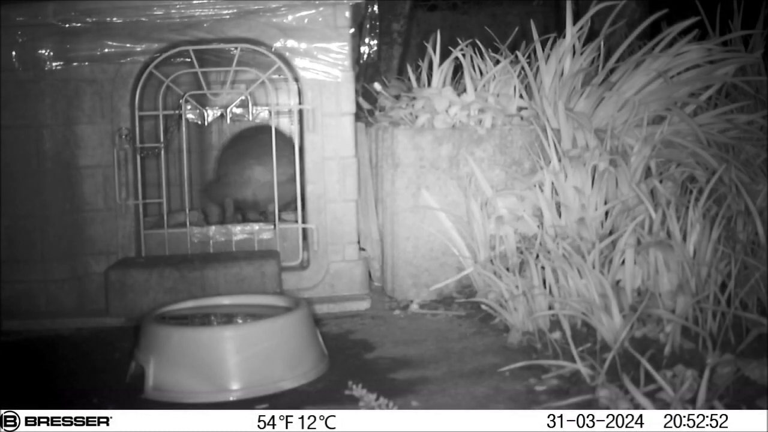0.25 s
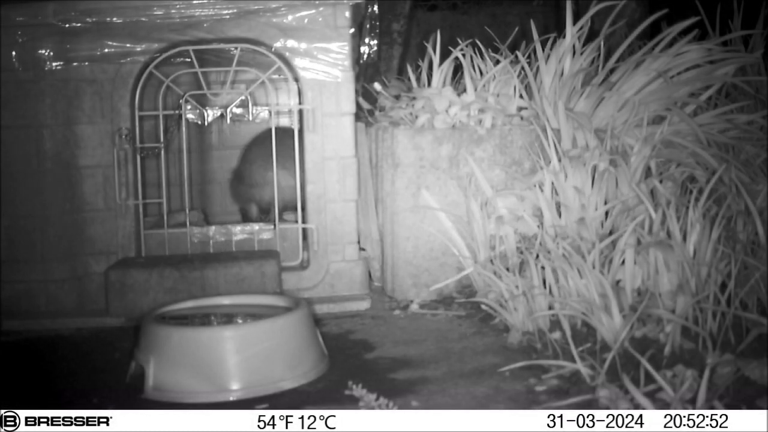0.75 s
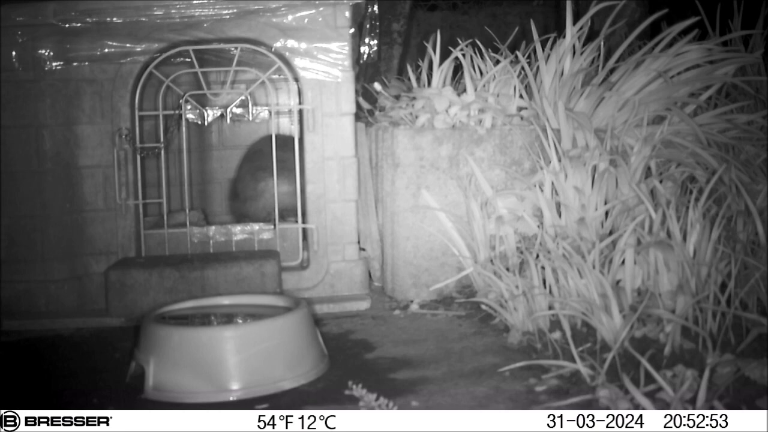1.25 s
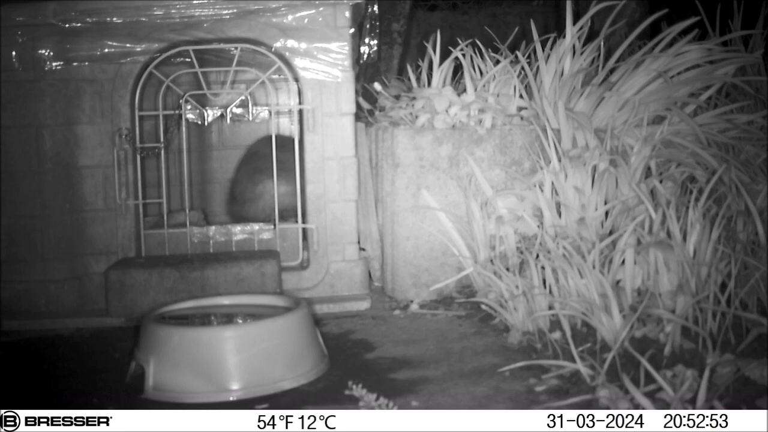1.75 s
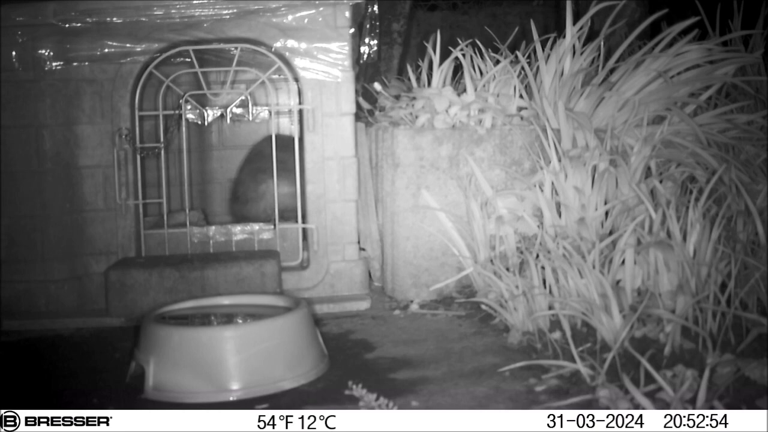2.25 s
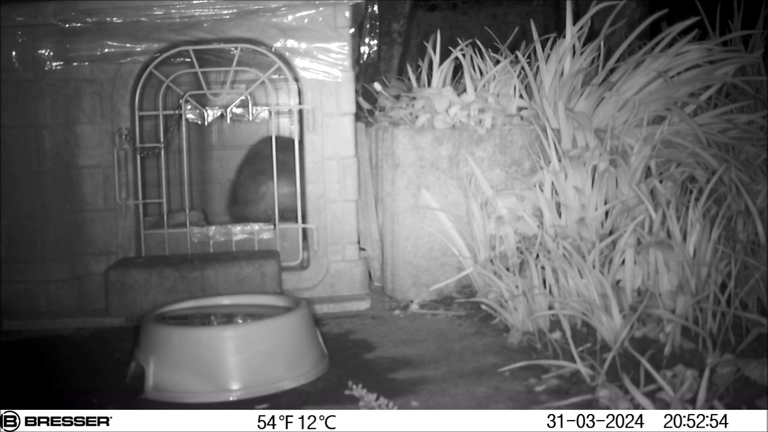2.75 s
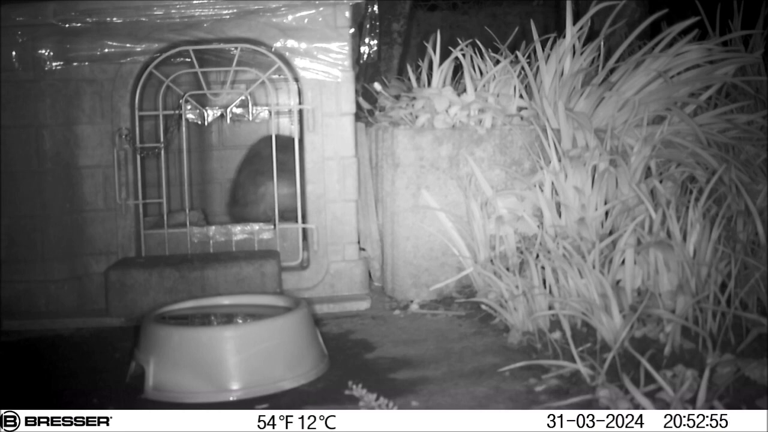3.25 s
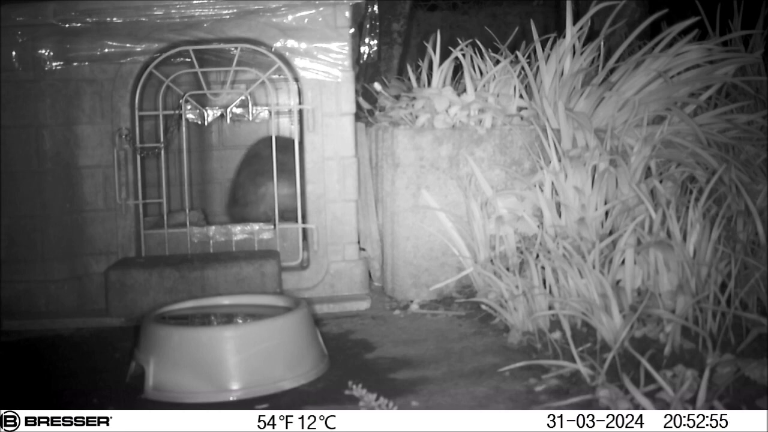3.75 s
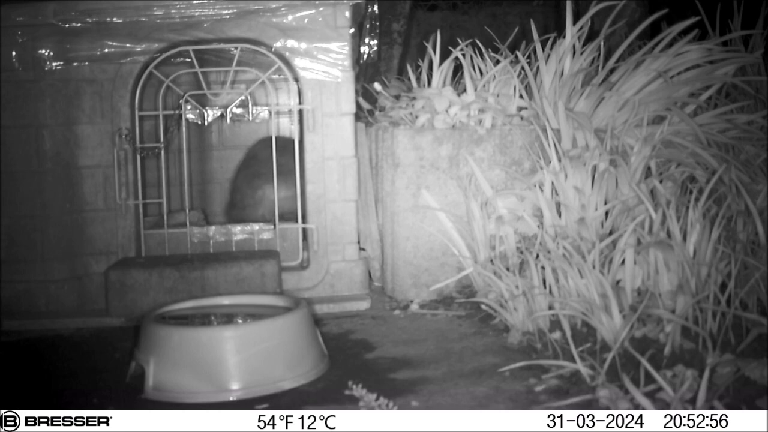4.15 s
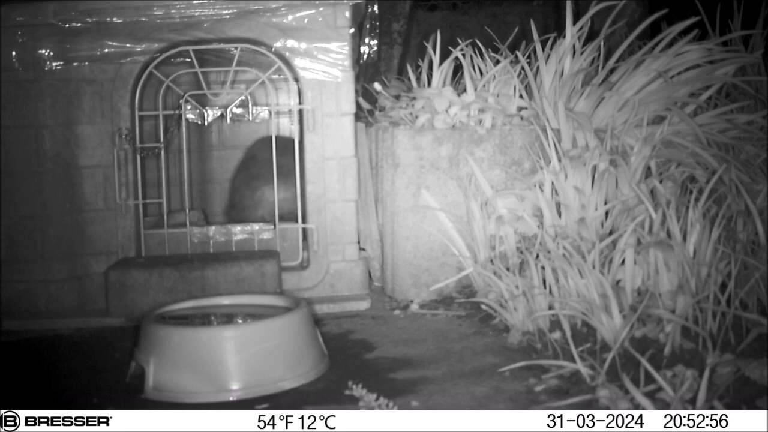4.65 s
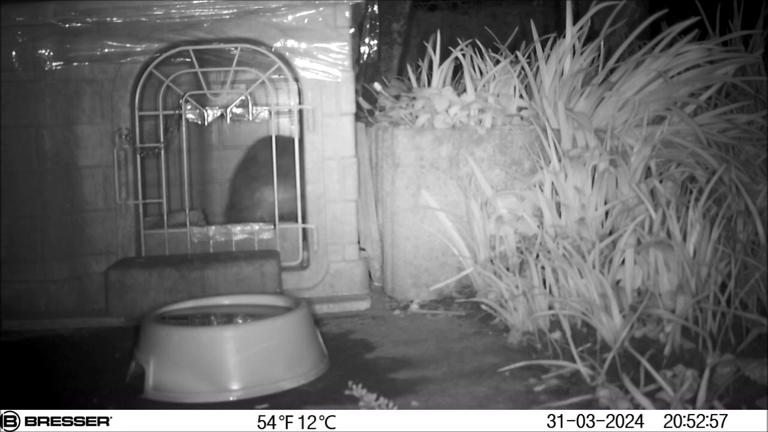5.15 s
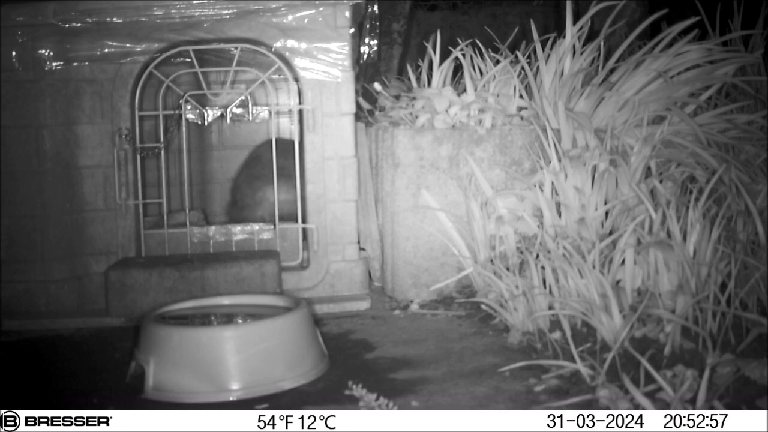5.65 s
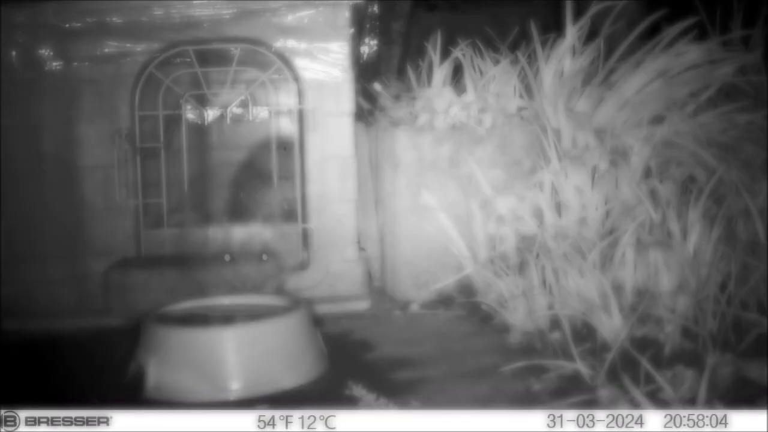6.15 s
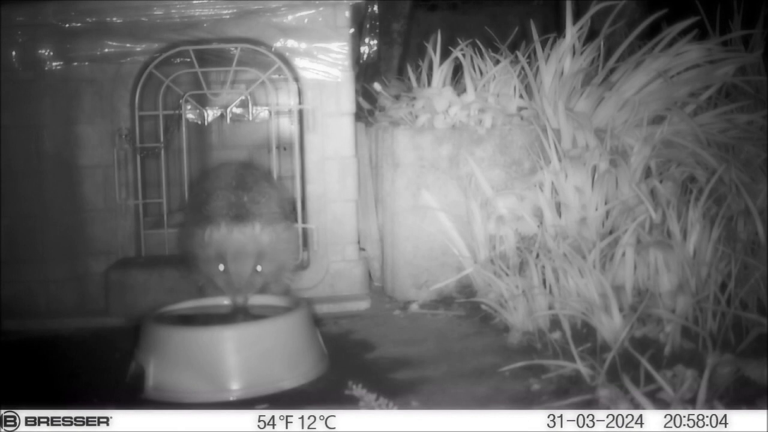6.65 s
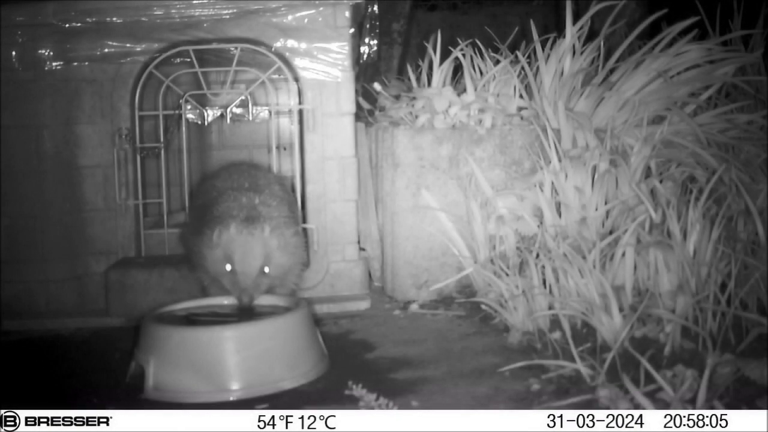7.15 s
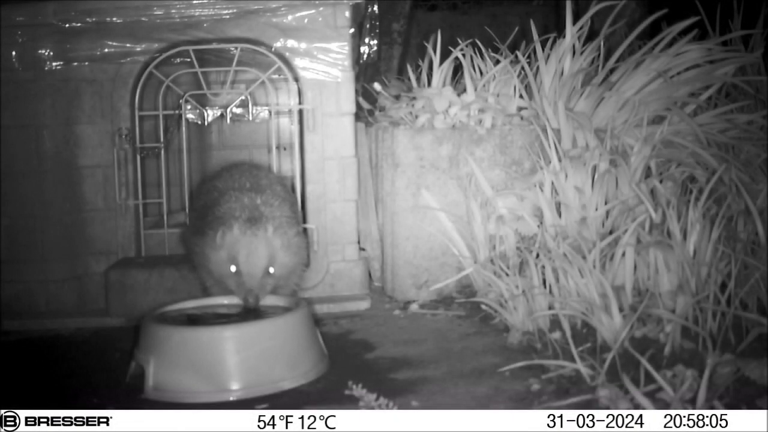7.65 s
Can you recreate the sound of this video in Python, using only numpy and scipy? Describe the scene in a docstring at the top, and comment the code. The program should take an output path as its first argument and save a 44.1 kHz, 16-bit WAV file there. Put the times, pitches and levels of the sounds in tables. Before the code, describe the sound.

Faint, irregular crunching of a hedgehog chewing outdoors at night, with two sharp claw scrapes and a steady low background noise.

```python
"""Hedgehog feeding at night

Close to a trail camera's microphone, in the doorway of a small garden shelter, a hedgehog chews dry food,
about four bites a second: bursts of tiny fractures that ring in the shelter. It brushes the wire gate,
then clambers out toward the bowl with two sharp scuffs of its claws and goes on nibbling.
Under it lie a distant rumble and drone, and the camera's own hiss and faint hum."""
import sys
import numpy as np
from scipy import signal
from scipy.fft import rfft, irfft
from scipy.io import wavfile

SR = 44100
rng = np.random.default_rng(int(sys.argv[2]) if len(sys.argv) > 2 else 0)


def unload_wav(signal):
    """Save mono or channel-first audio to the path in sys.argv[1] as 16-bit WAV at rate SR, clipped to [-1, 1]."""
    wavfile.write(
        sys.argv[1],
        SR,
        np.round(np.clip(np.atleast_2d(signal).T, -1, 1) * 32767).astype(np.int16),
    )


N = 348390
TIME = np.arange(N) / SR
BURST_TIME = np.arange(-SR // 4, SR // 4) / SR   # seconds around the peak of one short sound

# bites in the doorway: (time [s], break level [dB], break rise [s], centre [Hz], crackle [dB],
# grip level [dB], crumbling delay [s], crumbling level [dB], crumbling fall [s])
BITES = [ (1.837, -66, .006, 4900, -8, -62, 0.0033, -55, 0.0059),
         (2.011, -53.5, 0.0035, 6200, -12, -73, .044, -56, .007),
         (2.449, -43, 0.0035, 5300, -13.5, -60, 0.035, -53.5, .007),
         (2.667, -42.5, 0.0056, 5200, -20, -59, 0.022, -52, .013),
         (2.973, -52, .0015, 4870, -17, -68, 0.025, -50, 0.0053),
         (3.205, -47.5, 0.0053, 5100, -12, -60, .005, -59, 0.0077),
         (3.452, -47.5, .004, 3860, -15, -55, 0.0027, -53, 0.0072),
         (3.646, -47.5, .009, 5300, -22, -56.5, 0.0087, -51, 0.016),
         (3.966, -59, .006, 4700, -8, -66, 0.0053, -51, 0.0052),
         (4.185, -62.5, .005, 5400, -14, -74, 0.037, -58, .007),
         (4.377, -50.5, .006, 4700, -12, -57, 0.026, -51, 0.025),
         (4.63, -46, 0.0075, 5750, -18, -68, 0.029, -50.5, .011),
         (4.876, -46.5, 0.0044, 4700, -15, -59, .015, -52, 0.017),
         (5.102, -52, 0.0078, 4900, -9, -62, 0.014, -51, 0.02),
         (5.354, -59, .006, 5000, -11, -63, 0.0044, -55.5, 0.0078)]


def chewing(grip_lead_s=.028):
    """Each bite: the teeth grip, the food breaks, then the pieces crumble as the jaw closes."""
    out = np.zeros(N)
    for s, db, rise, centre_hz, crackle_db, grip_db, delay, crumble_db, crumble_fall in BITES:
        out += crunch(s - grip_lead_s, grip_db, centre_hz=5300, rise=0.0043, fall=.015, crackle_db=-13)
        out += crunch(s, db, centre_hz, rise, fall=0.01, crackle_db=crackle_db)
        out += crunch(s + delay, crumble_db, centre_hz=4450, rise=0.0063, fall=crumble_fall,
                      crackle_db=-2.5)
    return out


# resonances of the shelter: (frequency [Hz], width [Hz], level [dB])
SHELTER_MODES = [(1646, 105, 4), (2255, 190, 3.5), (2710, 210, 0), (3240, 85, 3), (3510, 77, 4),
                 (3970, 100, 0.5), (4190, 46, 3), (4656, 290, 0.5), (5140, 150, 0), (5610, 360, 0.5),
                 (6100, 43, -2), (6900, 270, -33), (7280, 730, -2.5), (7700, 740, -2), (10100, 1500, -6),
                 (11300, 1800, -9), (13600, 2400, -20)]


def crunch(s, db, centre_hz, rise, fall, crackle_db, vary_db=2.0, ring_up_s=.0015):
    """One burst of tiny fractures: the mouth colours them and the shelter rings with them."""
    hz, width, mode_db = np.transpose(SHELTER_MODES)
    envelope = swell(rise, fall)
    cracks = resonate(grains(per_s=4500, spread_db=4.0) * envelope, hz=6400, width_hz=7000)
    # the mouth favours the resonances near its centre; the crackle of a hard break reaches them all
    octaves = np.log2(hz / centre_hz)
    reach_octaves = np.where(octaves < 0, 0.39, 0.26)
    mouth = np.exp(-.5 * (octaves / reach_octaves) ** 2) + from_db(crackle_db)
    # the head moves, so the proportions change a little with every bite
    strength_db = mode_db + 20 * np.log10(mouth) + vary_db * rng.standard_normal(len(hz))
    burst = walls(ring(cracks, zip(hz, width, strength_db)), t60=0.06, wet_db=-6.0)
    out = np.zeros(N)
    add_burst(out, at_level(burst, envelope, db), s - ring_up_s)
    return out


# nibbling and nosing in the food: (time [s], level [dB], rise and fall [s], centre [Hz], crackle [dB])
NIBBLES = [(0.079, -61, .006, 6000, -1), (1.249, -68.5, 0.057, 4700, -18), (1.461, -56.5, .011, 5430, -12),
           (1.567, -64, .006, 5200, -18), (1.732, -63, .005, 5200, -8), (2.03, -56, .006, 6500, 1),
           (3.919, -62, 0.0092, 5400, -14), (4.766, -65, 0.017, 4600, 6), (5.623, -57, .013, 4100, -10),
           (5.911, -53, 0.0097, 4050, -6), (5.975, -59, 0.036, 5000, -7), (6.195, -56.5, .007, 4130, -4),
           (6.384, -56, 0.013, 5750, -18), (6.42, -54.5, 0.018, 5600, -7), (6.666, -49.5, 0.013, 4450, -2),
           (6.848, -59, 0.013, 5700, -20), (6.885, -51, .012, 4730, -8), (7.009, -57.5, 0.013, 4450, 1),
           (7.098, -51, 0.013, 5270, -12), (7.225, -64, .033, 4550, -13), (7.321, -59.5, 0.021, 4500, -15),
           (7.351, -57, .008, 5140, -11), (7.53, -63.5, 0.032, 4430, 8)]


def nibbling():
    """Soft crunches that swell and fade evenly."""
    return sum(crunch(s, db, hz, fade, fade, crackle_db) for s, db, fade, hz, crackle_db in NIBBLES)


# crisp snaps of food: (time [s], level [dB], pitch [Hz], width [Hz], fall [s], crackle [dB])
FOOD_SNAPS = [(1.604, -59.5, 4880, 500, 0.011, -22), (1.642, -64, 4950, 600, .007, -16),
              (6.056, -38.5, 6100, 2000, 0.0032, 14), (6.490, -51.5, 4630, 1000, 0.0034, -20),
              (6.773, -54, 3500, 1400, 0.0034, -22), (6.974, -48, 4260, 1300, 0.007, -26),
              (7.277, -44, 3400, 800, 0.002, -30), (7.599, -60, 4500, 2000, .002, -2),
              (7.682, -50.5, 4630, 1400, 0.0049, -13), (7.732, -60, 3780, 1000, 0.0056, -20),
              (7.744, -57, 4480, 900, 0.0063, -17), (7.770, -57, 3700, 1400, .003, -13),
              (7.800, -57, 4500, 2000, .002, -5)]


def snaps():
    """A hard crumb breaks at once and rings briefly at a pitch of its own."""
    out = np.zeros(N)
    for s, db, hz, width_hz, fall, crackle_db in FOOD_SNAPS:
        envelope = swell(.0001, fall)
        cracks = with_tap(grains(per_s=12000, spread_db=7.0) * envelope, tap_db=-4.0)
        tone = band(cracks, hz, width_hz)
        crackle = band(cracks, hz=5500, width_hz=6000)
        snap = walls(tone + from_db(crackle_db) * crackle, t60=0.083, wet_db=-7)
        add_burst(out, at_level(snap, envelope, db), s)
    return out


def crumbs(from_s=4.3, to_s=7.85, per_s=5, db=-66, spread_db=1):
    """Once the food is broken up, faint crumbs shift at random, one in each short stretch."""
    out = np.zeros(N)
    for slot_s in np.arange(from_s, to_s, 1 / per_s):
        shift, size = rng.uniform(-1, 1, 2)
        s = slot_s + .5 * shift / per_s
        out += crunch(s, db + spread_db * size, centre_hz=4900, rise=0.014, fall=0.014, crackle_db=-9)
    return out


# claws on the step: (time [s], level [dB], rise [s], fall [s], thock [dB], scratch [dB], tap [dB])
CLAW_STRIKES = [(6.1316, -30.5, 0.0023, 0.0046, 4.5, 8, -10), (6.135, -29.5, 0.0016, 0.0066, 6.5, 13, -25),
                (6.139, -32, .0015, 0.004, -2, -6, 1), (6.1495, -34, 0.0044, 0.0053, -11, 8, -14),
                (6.159, -44, 0.005, 0.0044, -13, 4, -14), (6.5936, -24.5, .0001, 0.0036, -6.5, -4, 3.5),
                (6.6038, -28, 0.0016, 0.0015, -16, -13, -2), (6.605, -30.5, 0.0029, 0.0035, 3.5, -8, -6),
                (6.648, -44.5, 0.0013, 0.0063, 16, -6, 5)]
# resonances of the step: (frequency [Hz], width [Hz], level [dB])
STEP_MODES = [(733, 90, -9), (1257, 75, -4), (1630, 110, -0.5), (2040, 200, -10), (2656, 75, -3.5),
              (3110, 180, -2), (3460, 110, -3), (4040, 130, 4.5), (4665, 97, 3), (5300, 140, -4),
              (5700, 104, -4.5), (7500, 1100, -22.5), (9100, 550, -15.5), (10400, 1600, -22),
              (12900, 2500, -27.5)]


def claws(thock_below_hz=2300, scratch_above_hz=6500, rasp_db=-8, low_cut_hz=700):
    """Claws strike, catch and slip: weight wakes the low modes of the step, a fast slip the high ones."""
    out = np.zeros(N)
    for s, db, rise, fall, thock_db, scratch_db, tap_db in CLAW_STRIKES:
        envelope = swell(rise, fall)
        force = with_tap(grains(per_s=9000, spread_db=1.0) * envelope, tap_db)
        modes = [(hz, width,
                  mode_db + thock_db * (hz < thock_below_hz) + scratch_db * (hz > scratch_above_hz))
                 for hz, width, mode_db in STEP_MODES]
        rasp = band(force, hz=3600, width_hz=4500)   # the claw itself, with no pitch
        scuff = rms_one(ring(force, modes)) + from_db(rasp_db) * rms_one(rasp)
        scuff = walls(scuff, t60=0.051, wet_db=-8.5)
        add_burst(out, at_level(scuff, envelope, db), s)
    # so small a contact radiates little bass
    return signal.sosfilt(signal.butter(2, low_cut_hz, "high", fs=SR, output="sos"), out + 1e-18)


# light touches on the gate: (time [s], level [dB], gain of all modes but the second [dB], pitch [ratio])
GATE_TOUCHES = [(.005, -57.5, -1.5, 0.99), (.05, -65, -16, 1), (.447, -60, -10, 1.002),
                (4.102, -52.5, -4.5, 1.01)]
# resonances of its wire: (frequency [Hz], width [Hz], level [dB])
WIRE_MODES = [(3140, 68, 3), (5380, 63, 2), (6700, 150, -12), (8000, 160, -10), (10200, 220, -10.5),
              (11600, 200, -12)]


def gate():
    """Spines flick and graze a wire of the gate; it pings faintly."""
    out = np.zeros(N)
    envelope = swell(rise=0.00024, fall=0.0099)
    for s, db, others_db, ratio in GATE_TOUCHES:
        graze = with_tap(grains(per_s=5000, spread_db=3.8) * envelope, tap_db=-2.0)
        modes = [(hz * ratio, width, mode_db + others_db * (k != 1))
                 for k, (hz, width, mode_db) in enumerate(WIRE_MODES)]
        add_burst(out, at_level(ring(graze, modes), envelope, db), s)
    return out


def walls(x, t60, wet_db):
    """Close walls add a short, dense tail of reflections, a new one for each place a sound comes from."""
    t = TIME[:SR // 8]
    tail = rng.standard_normal(len(t)) * from_db(-60 * t / t60) * (t > .002)
    return x + from_db(wet_db) * signal.fftconvolve(x, tail / np.linalg.norm(tail))[:len(x)]


# spectra of the far rumble and drone: (frequency [Hz], relative density [dB])
RUMBLE_SPECTRUM = [(15, -8), (30, -2), (48, 1), (75, -2.5), (100, -7), (140, -23.5)]
DRONE_SPECTRUM = [(60, -15.5), (100, -0.5), (160, -4.5), (230, -9.5), (290, -14.5), (370, -16),
                  (450, -26.5), (800, -28), (2000, -47)]
# the drone swells and recedes: (time [s], level before trim and lift [dB])
DRONE_SWELLS = [(0.0, -58.5), (0.53, -57.5), (1.82, -58.5), (2.0, -56.5), (4.29, -59), (5.28, -57.5),
                (5.59, -58), (6.84, -55), (7.9, -60)]


def distance(drone_trim_db=0.16):
    """Low noise from far outdoors: a deep rumble and a slowly wandering drone."""
    rumble = lifted_gain(-54, lift_db=3.5) * noise(RUMBLE_SPECTRUM)
    drone_db = np.interp(TIME, *np.transpose(DRONE_SWELLS)) + drone_trim_db
    drone = lifted_gain(drone_db, lift_db=1.0) * noise(DRONE_SPECTRUM)
    return rumble + drone


# hiss of the microphone: (frequency [Hz], relative density [dB])
HISS_SPECTRUM = [(100, -6), (500, 3), (1000, -1), (1600, -1), (2300, -5), (3500, -7.5), (5000, -8),
                 (7000, -13.5), (9000, -11), (11000, -12.5), (13500, -17.5), (16000, -9.5)]
# narrow bands in the hiss: (frequency [Hz], width [Hz], level [dB])
HISS_BANDS = [(1570, 520, 1), (9100, 300, 1.5), (12440, 430, -2.5)]
# hum of the camera: (frequency [Hz], level [dB])
HUM_TONES = [(49, -67.5), (100, -66.5), (150, -68.5), (200, -80.5), (300, -87.5)]


def camera_noise(whine_db=-8):
    """The trail camera's own noise: microphone hiss with a slight whine, and a faint steady hum."""
    whine = rms_one(ring(rng.standard_normal(N), HISS_BANDS))
    hiss = lifted_gain(-66.5, lift_db=4) * (noise(HISS_SPECTRUM) + from_db(whine_db) * whine)
    hum = sum(np.sqrt(2) * from_db(db) * np.sin(2 * np.pi * (hz * TIME + rng.random()))
              for hz, db in HUM_TONES)
    return hiss + hum


def lifted_gain(db, lift_db, from_s=5.89, to_s=7.40, ramp_s=0.016):
    """Gain over time of a background layer that is louder for a while."""
    inside_s = np.minimum(TIME - from_s, to_s - TIME)
    return from_db(db + lift_db * np.clip(.5 + inside_s / ramp_s, 0, 1))


def noise(spectrum):
    """Steady noise of a given colour, rms 1."""
    hz, db = np.transpose(spectrum)
    bins = np.maximum(np.fft.rfftfreq(N, 1 / SR), 1)
    gain = from_db(np.interp(np.log(bins), np.log(hz), db, left=-np.inf, right=-np.inf))
    return rms_one(irfft(rfft(rng.standard_normal(N)) * gain, N))


def swell(rise, fall):
    """Exponential build-up and decay around time zero, with time constants in seconds."""
    return np.exp(-np.abs(BURST_TIME) / np.where(BURST_TIME < 0, rise, fall))


def grains(per_s, spread_db):
    """Tiny clicks at random moments, of uneven size and either sign."""
    n = len(BURST_TIME)
    sizes = from_db(spread_db * np.clip(rng.standard_normal(n), -2, 2)) * rng.choice([-1, 1], n)
    return sizes * (rng.random(n) < per_s / SR)


def with_tap(clicks, tap_db):
    """Add one hard contact at time zero, sized against the energy of the clicks around it."""
    return clicks + from_db(tap_db) * np.linalg.norm(clicks) * (BURST_TIME == 0)


def resonate(x, hz, width_hz):
    """One resonance with gain 1 at its peak."""
    r = np.exp(-np.pi * width_hz / SR)
    feedback = [1, -2 * r * np.cos(2 * np.pi * hz / SR), r * r]
    return signal.lfilter(np.array([1, 0, -1]) * (1 - r * r) / 2, feedback, x + 1e-18)


def band(x, hz, width_hz):
    """The same resonance twice in series, for steeper sides."""
    return resonate(resonate(x, hz, width_hz), hz, width_hz)


def ring(x, modes):
    """Resonances in parallel, with alternating signs; each takes energy in proportion to its width."""
    return sum((-1) ** k * from_db(db) * np.sqrt(width) * rms_one(resonate(x, hz, width))
               for k, (hz, width, db) in enumerate(modes))


def at_level(sound, envelope, db):
    """Give a burst the energy of its envelope at this level."""
    return from_db(db) * rms_one(sound) * np.sqrt(np.mean(envelope ** 2))


def add_burst(out, burst, s):
    """Mix a burst in with its time zero at s seconds."""
    start = round((s + BURST_TIME[0]) * SR)
    first, last = max(start, 0), min(start + len(burst), N)
    out[first:last] += burst[first - start:last - start]


def from_db(db):
    """Decibels to gain."""
    return 10 ** (np.asarray(db) / 20)


def rms_one(x):
    """Scale to rms 1."""
    return x / np.sqrt(np.mean(x ** 2) + 1e-20)


def scene():
    """The night background and the animal's small, close sounds, at one microphone."""
    background = distance() + camera_noise()
    return (background + chewing() + nibbling() + snaps() + claws() + gate() + crumbs())[None]


def record(dry, cutoff_hz=15600):
    """The highest treble is cut steeply."""
    return signal.sosfilt(signal.ellip(12, .1, 80, cutoff_hz, fs=SR, output="sos"), dry)


dry = scene()
out = record(dry)
unload_wav(out)
```